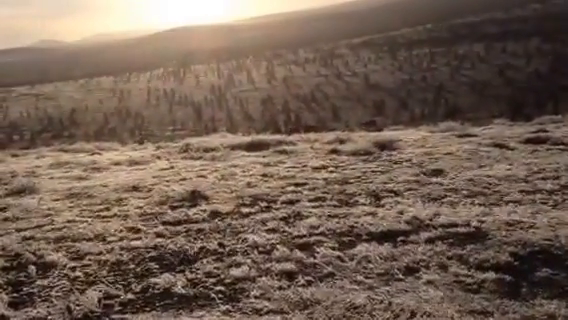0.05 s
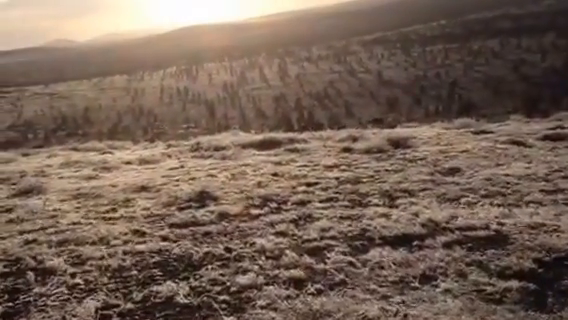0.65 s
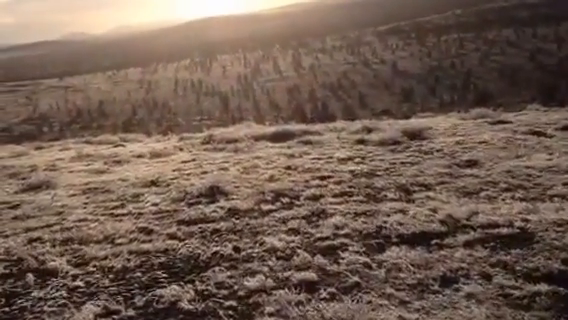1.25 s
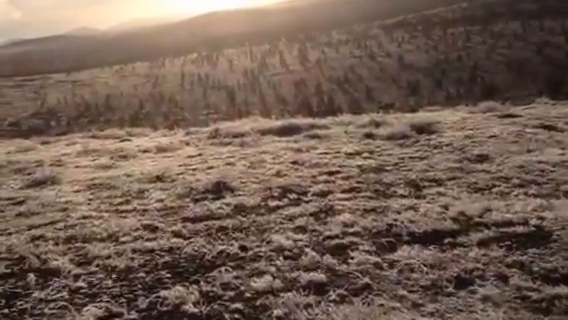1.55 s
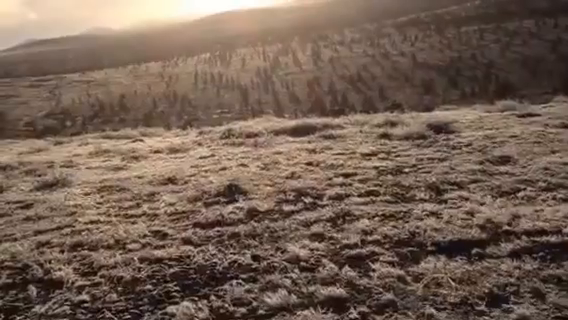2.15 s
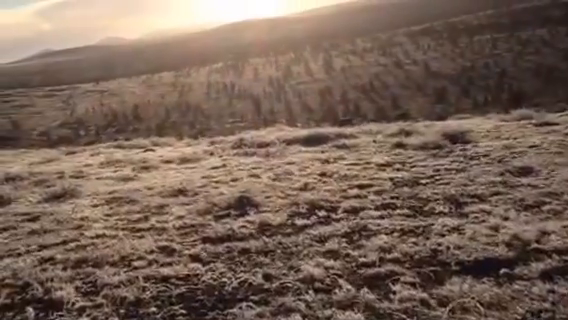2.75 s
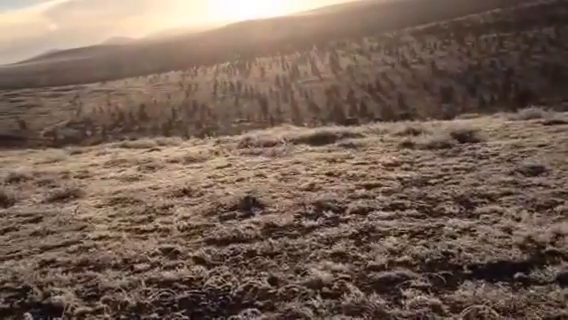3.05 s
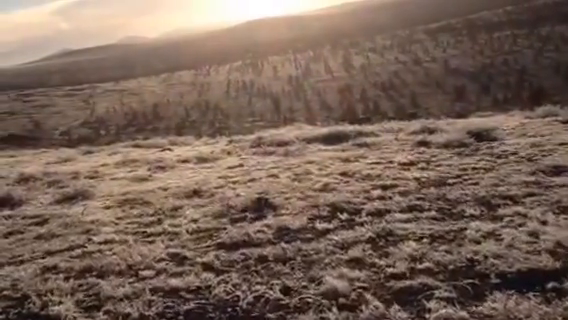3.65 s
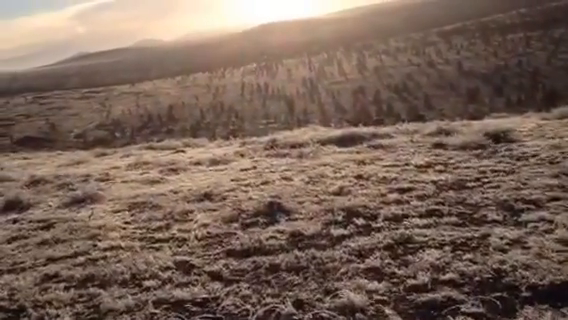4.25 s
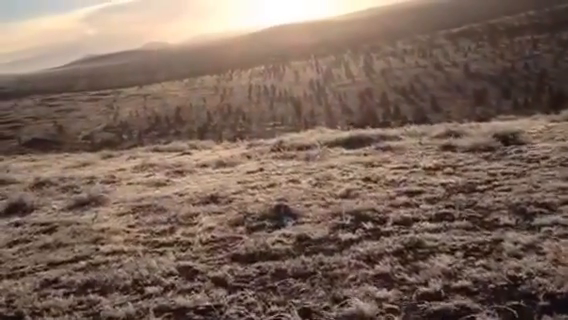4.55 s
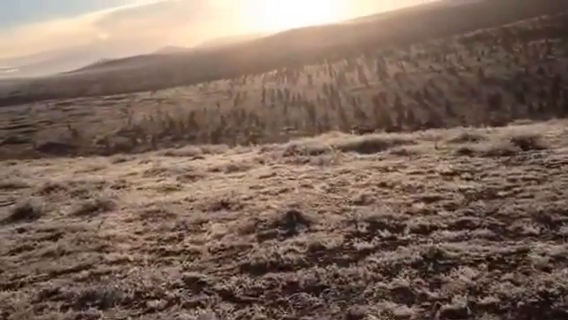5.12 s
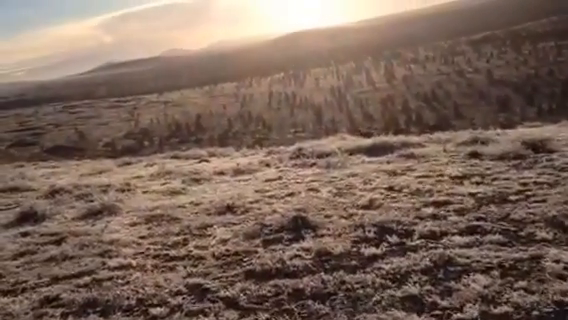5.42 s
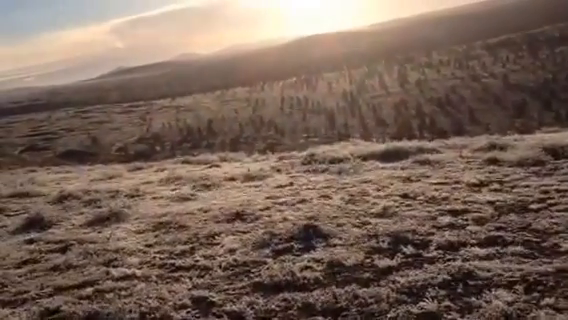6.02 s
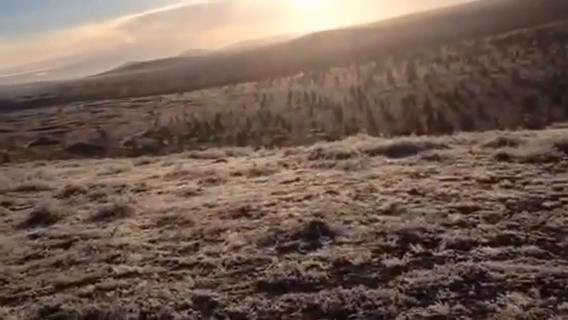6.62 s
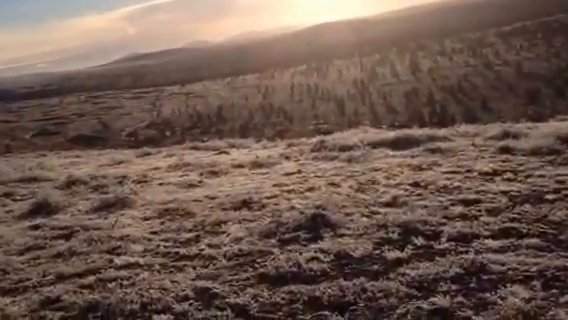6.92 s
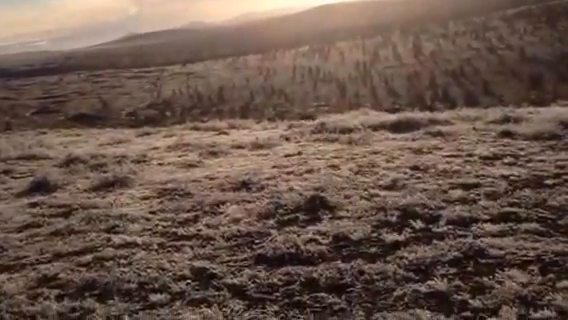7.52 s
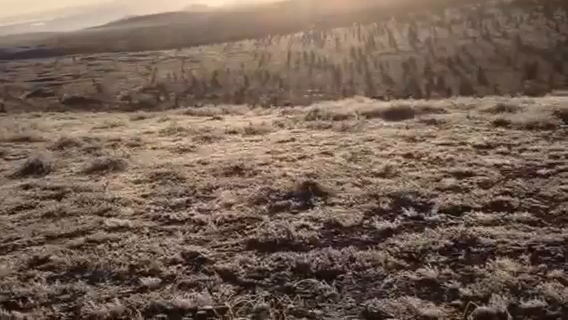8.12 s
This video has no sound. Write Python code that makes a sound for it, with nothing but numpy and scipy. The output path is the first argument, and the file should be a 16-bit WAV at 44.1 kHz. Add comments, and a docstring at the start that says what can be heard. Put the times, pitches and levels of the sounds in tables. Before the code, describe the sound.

Light wind buffets a hand-held microphone in ragged, low bursts, with faint jacket rustling and small handling clicks on a quiet hillside.

```python
"""Short, dull, ragged puffs of light wind hit the microphone of a hand-held camera, and the hardest
eddies thump. As the arm slowly turns, a jacket sleeve slides in strokes: the cloth hisses, its padding
rustles, creases crackle and the ribs of the weave zip over each other. The hand makes a few small ticks
on the case. Behind it all lie the faint air of a quiet, frosty hillside and the rumble of far wind."""
import sys
import numpy as np
from scipy import signal
from scipy.fft import rfft, irfft, next_fast_len
from scipy.io import wavfile
from scipy.ndimage import uniform_filter1d, map_coordinates

SR = 44100
rng = np.random.default_rng(int(sys.argv[2]) if len(sys.argv) > 2 else 0)


def int16_out(signal):
    """Quantize to a 16-bit WAV file."""
    q = np.round(np.clip(np.atleast_2d(signal).T, -1, 1) * 32767)
    wavfile.write(sys.argv[1], SR, q.astype(np.int16))


N = 365148


def amp(db):
    """Decibels to gain."""
    return 10 ** (np.asarray(db) / 20)


def unit(x):
    """Scale to rms 1."""
    return x / np.sqrt(np.mean(x ** 2) + 1e-20)


def wobble(rate):
    """A smooth random curve with `rate` knots a second."""
    return map_coordinates(rng.standard_normal(int(N * rate / SR) + 4), [np.arange(N) * rate / SR])


def filtered(x, response):
    """Shape x with a frequency response, given as a function of Hz."""
    size = next_fast_len(len(x) + 4096)
    return irfft(rfft(x, size) * response(np.fft.rfftfreq(size, 1 / SR)), size)[:len(x)]


def noise(spectrum):
    """Noise of rms 1, coloured by rows of freq_hz, gain_db."""
    freq_hz, gain_db = np.transpose(spectrum)
    colour = lambda hz: amp(np.interp(np.log(hz + 1), np.log(freq_hz), gain_db))
    return unit(filtered(rng.standard_normal(N), colour))


def low_cut(hz, corner_hz):
    """A causal bass roll-off like the microphone's, 24 dB an octave."""
    s = 1j * hz / corner_hz
    return (s * s / (s * s + np.sqrt(2) * s + 1)) ** 2


def add(track, centre_s, sound):
    """Mix a sound in with its middle at centre_s."""
    at = round(centre_s * SR) - len(sound) // 2 + np.arange(len(sound))
    inside = (at >= 0) & (at < N)
    track[at[inside]] += sound[inside]


# Colour of the air bed: freq_hz, gain_db
AIR_EQ = [(240, -56), (400, -3), (725, -6), (999, -8.5), (1060, -8.5), (1200, -9), (2310, -10.5),
          (2990, -11.5), (4120, -12.5), (9980, -19.5), (15300, -17.5)]

def still_air():
    """A faint, even bed of still air and microphone hiss."""
    return amp(-72.5) * noise(AIR_EQ)


# Colour of the distant rumble: freq_hz, gain_db
RUMBLE_EQ = [(20, -22.5), (40, -8), (70, -3), (110, 5.5), (180, 3), (280, -12.5), (500, -26), (1500, -61.5)]

def far_wind():
    """Wind far away, heard as a steady low rumble."""
    return amp(-66) * noise(RUMBLE_EQ)


# Ticks of the hand on the case: start_s, peak_db, brightness_hz
CASE_TICKS = [(0.26, -44.5, 1580), (0.4437, -41.5, 2000), (0.4542, -40.5, 2800), (0.505, -47, 9000),
              (1.221, -43.5, 11560), (1.902, -50, 2480), (2.637, -48, 2500), (2.66, -51.5, 1800),
              (2.878, -46, 2500), (3.171, -44, 9000), (3.481, -42, 2900), (4.696, -42, 9000),
              (4.833, -44, 12000), (4.901, -39.5, 4000), (5.2346, -25, 11700), (5.245, -46, 900),
              (6.142, -44.5, 1700)]

def case_ticks():
    """Each touch gives a sharp snap and a few milliseconds of rattle in the case."""
    out, t = np.zeros(N), np.arange(SR // 30) / SR
    for start_s, peak_db, brightness_hz in CASE_TICKS:
        rattle = 0.07 * amp(-60 * t / 0.012) * rng.standard_normal(len(t))  # down 60 dB in 12 ms
        body = lambda hz: 1 / (1 + 1.3j * hz / brightness_hz - (hz / brightness_hz) ** 2)
        tick = filtered((t == 0) + rattle, lambda hz: low_cut(hz, corner_hz=450) * body(hz))
        centred = np.pad(tick, (len(t), 0))  # puts the snap in the middle
        add(out, start_s, amp(peak_db) * centred / np.abs(tick).max())
    return out


# Zips of the weave: centre_s, relative_db, length_s, rib_rate_hz, jitter_ratio
WEAVE_ZIPS = [(0.069, -54.5, 0.034, 3150, 0.11), (0.159, -55.5, 0.06, 4360, 0.068),
              (0.931, -68.5, 0.061, 3460, 0.11), (1.07, -57, 0.025, 6600, 0.11),
              (2.451, -66.5, 0.064, 3340, .07), (2.607, -62.5, 0.019, 7100, .06),
              (3.147, -55.5, 0.05, 2410, 0.012), (3.903, -60, 0.025, 3600, 0.059),
              (4.608, -58.5, 0.03, 3100, 0.038), (5.446, -52.5, 0.019, 6830, 0.051),
              (6.025, -67.5, 0.031, 2250, 0.081), (6.274, -64, 0.066, 3360, .06)]

def weave_zips():
    """Ribs catch at an uneven rate that rises and levels off: a fuzzy tone and its octave."""
    out, t = np.zeros(N), np.arange(-SR // 6, SR // 6) / SR
    for centre_s, relative_db, length_s, rib_rate_hz, jitter_ratio in WEAVE_ZIPS:
        travel = np.clip(t / length_s, -1.5, 1.5)
        glide_hz = 190 * travel - 80 * travel ** 2
        waver = unit(uniform_filter1d(rng.standard_normal(len(t)), size=24))
        phase = 2 * np.pi * np.cumsum(rib_rate_hz * (1 + jitter_ratio * waver) + glide_hz) / SR
        rasp = unit(filtered(rng.standard_normal(len(t)), lambda hz: 1 / (1 + (hz / 280) ** 2)))
        tone = unit((np.sin(phase) + 0.81 * np.sin(2 * phase)) * (0.12 + rasp))
        swell = 2 ** (-2 * (t / length_s) ** 2)
        add(out, centre_s, amp(relative_db - 1.1) * tone * swell)
    return out


# Strokes of the sleeve, levels relative: fastest_s, rise_s, fall_s, hiss_db, rustle_db
SLEEVE_STROKES = [(.07, .09, 0.033, -52, -61.5), (0.199, 0.098, 0.046, -53, -67),
                  (.6, 0.13, 0.17, -62.5, -64), (.93, 0.17, 0.11, -71, -69), (1.06, 0.012, 0.02, -58, -91),
                  (1.439, 0.062, 0.13, -54, -55.5), (1.75, 0.29, 0.24, -66.5, -64.5),
                  (2.24, 0.11, 0.14, -65, -60), (2.44, 0.057, 0.11, -65, -67),
                  (2.93, .035, .15, -60, -55.5), (3.27, .18, 0.045, -56.5, -63.5),
                  (3.72, 0.16, 0.11, -62.5, -60), (3.901, 0.043, 0.034, -57, -66),
                  (3.98, .18, 0.12, -70, -66.5), (4.42, 0.069, 0.096, -61, -55.5),
                  (4.61, 0.034, 0.026, -57.5, -61.5), (4.71, 0.031, 0.027, -60.5, -66),
                  (4.91, 0.034, 0.066, -67.5, -59.5), (5.1, .08, 0.059, -59.5, -56),
                  (5.4, 0.25, 0.051, -65, -61.5), (5.64, 0.081, 0.084, -66, -62.5),
                  (5.809, 0.07, 0.11, -67, -60.5), (6.28, 0.027, 0.034, -57, -84),
                  (6.37, 0.046, .09, -73.5, -66)]

def stroke_envelopes():
    """Gains of hiss and rustle: strokes swell and fade over a light contact that ends with the turn."""
    t = np.arange(N) / SR
    arm_rests_s, settle_s = 6.96, 0.58
    contact_hiss_db, contact_rustle_db = -73.5, -72
    flatness = 2.6  # 2 is a bell; higher holds its level and lets go more abruptly
    turning = np.clip((arm_rests_s - t) / settle_s, 0, 1)
    power = np.outer(amp([contact_hiss_db, contact_rustle_db]), turning) ** 2
    for fastest_s, rise_s, fall_s, hiss_db, rustle_db in SLEEVE_STROKES:
        away = np.maximum((fastest_s - t) / rise_s, (t - fastest_s) / fall_s)
        near = away < 4
        swell = 2 ** -away[near] ** flatness
        power[:, near] += np.outer(amp([hiss_db, rustle_db]), swell) ** 2
    return np.sqrt(power)


# Colours of the bright outer cloth and the duller padding: freq_hz, gain_db
CLOTH_EQ = [(600, -22.5), (1500, -4.5), (2000, -4), (2600, -0.5), (4700, 1), (5400, -2), (6800, -.5),
            (8500, -1), (10700, -7), (15300, -7)]
PADDING_EQ = [(200, -23.5), (450, 0), (750, -1.5), (1150, -1), (1500, -6.5), (2000, -11.5), (5000, -21),
              (12000, -36)]

def sleeve():
    """Cloth slides with a grainy hiss over the rustle of its padding; creases crackle as it folds."""
    hiss_gain, rustle_gain = stroke_envelopes()
    grain = unit(amp(1.48 * wobble(20) + 1.32 * wobble(70) + 1.4 * wobble(900)))
    creases = (rng.random(N) < 55 / SR) * rng.uniform(-0.91, 1, N)  # about 55 snaps a second
    crease_colour = lambda hz: low_cut(hz, corner_hz=690) / (1 + 1j * hz / 2500) ** 2
    crackle = amp(-10.5) * unit(filtered(creases, crease_colour))
    hiss = amp(-1.5) * hiss_gain * noise(CLOTH_EQ)
    rustle = amp(-0.7) * rustle_gain * (noise(PADDING_EQ) + crackle)
    return grain * (hiss + rustle)


# Level ride of the flow between the puffs: time_s, relative_db
BREEZE_RIDE = [(0, -54), (0.2, -55.5), (0.27, -78), (0.5, -55), (0.85, -49.5), (1.0, -63), (1.5, -66),
               (1.88, -58), (2.05, -49), (2.45, -62.5), (2.7, -50.5), (2.85, -60), (3.45, -65.5),
               (3.7, -52.5), (4.2, -49), (4.33, -63), (4.55, -60), (5.2, -56), (5.72, -62), (6.05, -60),
               (6.27, -69), (6.5, -66), (6.72, -74.5), (7.3, -53), (7.6, -76), (7.9, -72), (8.05, -74.5),
               (8.28, -48.5)]
# Colour of that flow: freq_hz, gain_db
BREEZE_EQ = [(20, -9.5), (45, -11.5), (80, -8.5), (125, 3), (180, 3.5), (260, -7.5), (400, -20.5),
             (700, -44), (1400, -58), (2500, -120)]

def breeze():
    """A low, restless flow over the microphone, fluttering at random as it swells and sinks."""
    ride_db = np.interp(np.arange(N) / SR, *np.transpose(BREEZE_RIDE))
    flow = noise(BREEZE_EQ)
    flutter_db = 14 * np.tanh(wobble(42))
    return amp(ride_db + 9.5) * unit(flow * amp(flutter_db))


# Puffs at the microphone port: centre_s, level_db, length_s, softness_hz
# The spectrum falls by 1/e over each span of softness_hz, so lower is duller.
WIND_PUFFS = [(0.1, -29, 0.029, 124), (0.321, -38.5, 0.021, 83), (0.384, -28, 0.021, 86),
              (0.484, -38, 0.01, 75), (0.536, -28.5, 0.0074, 192), (0.632, -23, 0.022, 187),
              (0.709, -32.5, 0.01, 82), (0.742, -23, 0.0033, 113), (0.794, -28, 0.0233, 120),
              (0.884, -37.5, 0.013, 90), (1.221, -37, 0.016, 99), (1.643, -29.5, 0.0061, 81.6),
              (1.761, -33, 0.013, 109), (1.954, -29, 0.021, 96), (1.997, -33.5, 0.026, 120),
              (2.123, -28, 0.012, 77), (2.155, -26.5, 0.012, 96), (2.297, -23.5, 0.017, 128),
              (2.382, -36, 0.027, 126), (2.497, -33.5, 0.016, 105), (2.539, -30, 0.011, 111),
              (2.588, -25, 0.021, 154), (2.746, -33.5, 0.018, 88), (2.974, -34, 0.027, 123),
              (3.272, -33.5, 0.014, 69), (3.601, -29.5, 0.0055, 62), (3.646, -34.5, 0.022, 124),
              (3.82, -34, 0.015, 58), (3.856, -33, 0.018, 99), (3.924, -34.5, 0.0099, 174),
              (3.988, -31.5, 0.025, 103), (4.118, -41, 0.038, 85), (4.18, -35.5, 0.019, 103),
              (4.223, -33, 0.029, 80), (4.379, -43, 0.03, 92.5), (4.548, -41, 0.022, 73.4),
              (4.727, -34, 0.02, 86.5), (4.766, -32, 0.0095, 136), (4.8, -25.5, 0.012, 81),
              (4.833, -31.5, 0.0077, 106), (4.975, -42, 0.046, 93), (5.062, -23.5, 0.0065, 89),
              (5.123, -30.5, 0.0059, 145), (5.311, -38, 0.028, 109), (5.39, -37.5, 0.022, 89),
              (5.49, -30, 0.0064, 126), (5.521, -34, 0.012, 121), (5.62, -33, 0.021, 105),
              (5.659, -31, 0.014, 99), (5.902, -26, 0.016, 136), (6.026, -41.5, 0.04, 63.5),
              (6.205, -35.5, 0.0043, 96), (6.323, -34.5, 0.016, 69.4), (6.384, -29.5, 0.015, 98),
              (6.446, -24.5, 0.0089, 114), (6.791, -34.5, 0.01, 60), (6.952, -34.5, 0.025, 80),
              (7.144, -32, 0.007, 156), (7.214, -30, 0.03, 89), (7.391, -24.5, 0.039, 189),
              (7.488, -28.5, 0.026, 91), (7.683, -44, 0.025, 71), (8.218, -31, 0.016, 163.5)]

def puffs():
    """Wind strikes the port in bell-shaped swells of dull noise, torn by a fast flutter."""
    out, t = np.zeros(N), np.arange(-SR // 8, SR // 8) / SR
    ragged_db, tears_per_s = 3, 110.5
    for centre_s, level_db, length_s, softness_hz in WIND_PUFFS:
        colour = lambda hz: low_cut(hz, corner_hz=148.4) * np.exp(-hz / softness_hz - (hz / 1500) ** 4)
        analytic = signal.hilbert(unit(filtered(rng.standard_normal(len(t)), colour)))
        evened = analytic.real / (np.abs(analytic) ** 2 + 0.5) ** 0.175  # softens the noise's beats
        tear = map_coordinates(rng.standard_normal(40), [(t - t[0]) * tears_per_s], mode="wrap")
        puff = evened * amp(ragged_db * tear) * 2 ** (-2 * (t / length_s) ** 2)
        rms = np.sqrt(np.sum(puff ** 2) / (length_s * SR))
        add(out, centre_s, amp(level_db) * puff / rms)
    return out


def small_eddies():
    """Each puff carries one small eddy near its middle: rows of centre_s, relative_db, pitch_hz."""
    chance = rng.standard_normal((len(WIND_PUFFS), 2))
    return [(centre_s + length_s * when / 4, level_db + 2 + 2 * size, 2.59 * softness_hz)
            for (centre_s, level_db, length_s, softness_hz), (when, size) in zip(WIND_PUFFS, chance)]


# Eddies that hit the port squarely: centre_s, relative_db, pitch_hz
HARD_EDDIES = [(.535, -18, 437), (.6245, -11.5, 560), (0.628, -7.5, 215), (0.6315, -7.5, 920),
               (0.659, -13.5, 336), (0.779, -14.5, 330), (2.304, -25.5, 420), (2.585, -14.5, 630),
               (3.926, -16.5, 270), (4.173, -20.5, 273), (4.763, -31.5, 360), (5.315, -27.5, 357),
               (5.489, -22.5, 327), (5.888, -28.5, 420), (7.359, -30, 800), (7.3695, -5, 360),
               (7.379, -13, 490), (7.3962, -4.5, 400), (7.413, -10.5, 270), (7.464, -23.5, 363),
               (7.497, -17.5, 230), (8.224, -15.5, 326)]

def eddy_thumps(flow):
    """Each eddy shoves the flow aside: a smooth pressure dip that the bass roll-off turns into a swing."""
    thumps, ducking, t = np.zeros(N), np.zeros(N), np.arange(-SR // 25, SR // 25) / SR
    for centre_s, relative_db, pitch_hz in HARD_EDDIES + small_eddies():
        dip = -1 / (1 + (3 * pitch_hz * t) ** 2) ** 2
        top_hz = min(2.77 * pitch_hz, 1550)
        swing = filtered(dip, lambda hz: low_cut(hz, 0.4 * pitch_hz) / (1 + (hz / top_hz) ** 6))
        add(thumps, centre_s, amp(relative_db - 5) * swing / np.abs(swing).max())
        add(ducking, centre_s, np.exp(-(t * pitch_hz / 1.1) ** 2))
    return thumps + flow / (1 + 2 * ducking)


def wind_buffet():
    """Breeze, puffs and eddies buffet the microphone, which sheds their deepest bass."""
    pressure = eddy_thumps(breeze() + puffs())
    return filtered(pressure, lambda hz: np.abs(low_cut(hz, corner_hz=78)))


def scene():
    """Mono mix: wind up front, sleeve and hand beneath it, the hillside behind."""
    return (wind_buffet() + far_wind() + sleeve() + weave_zips() + case_ticks() + still_air())[None]


def record(dry):
    """The camera passes nothing above its band limit."""
    top_hz = 15350
    return filtered(dry[0], lambda hz: hz < top_hz)[None]


dry = scene()
out = record(dry)
int16_out(out)
```